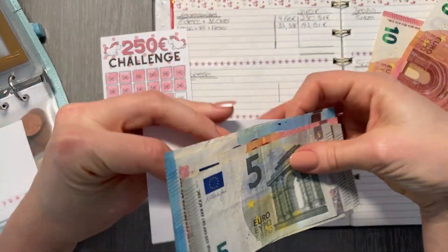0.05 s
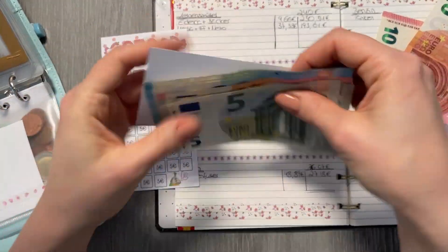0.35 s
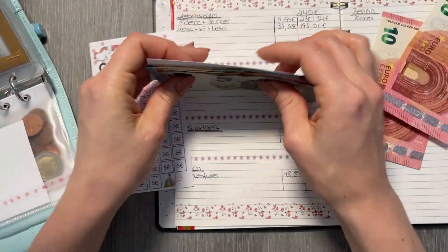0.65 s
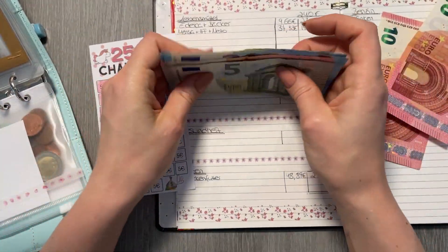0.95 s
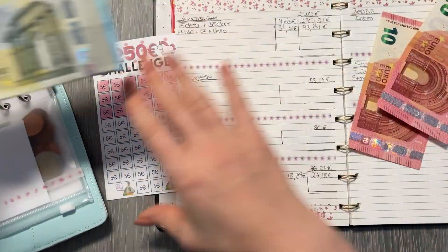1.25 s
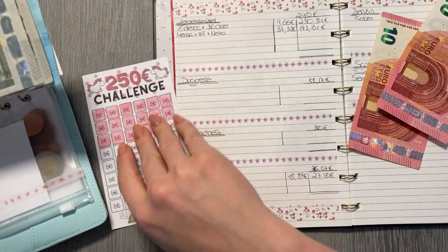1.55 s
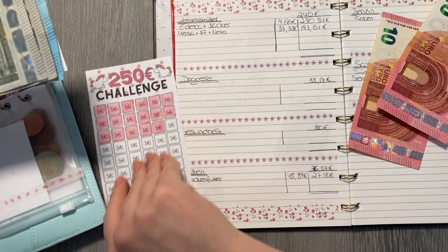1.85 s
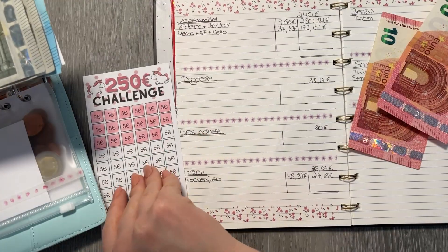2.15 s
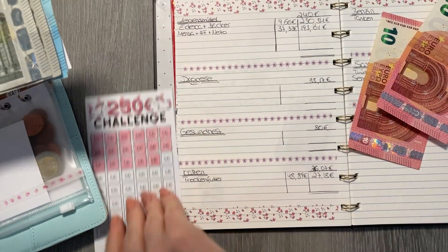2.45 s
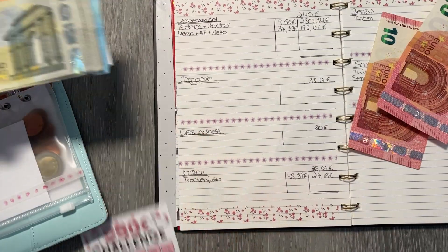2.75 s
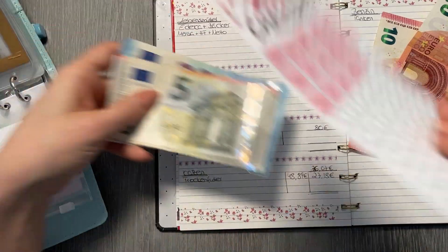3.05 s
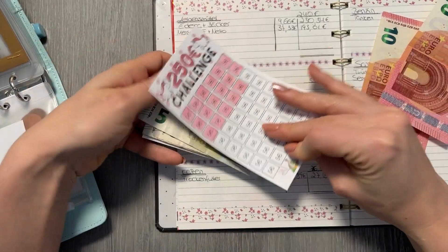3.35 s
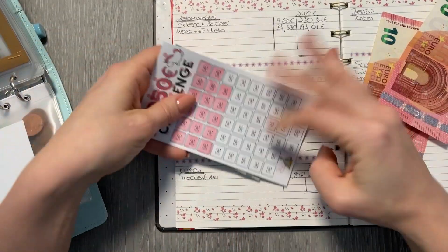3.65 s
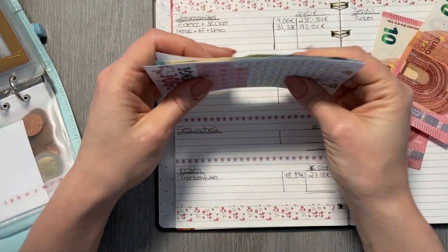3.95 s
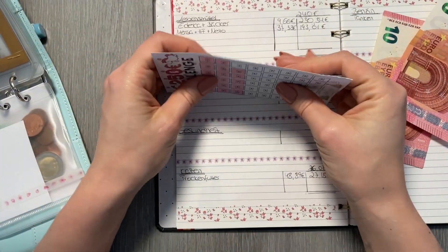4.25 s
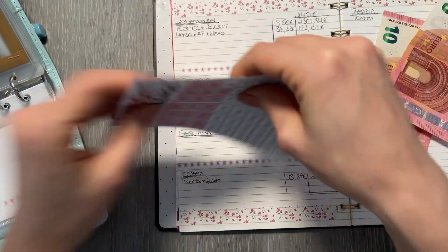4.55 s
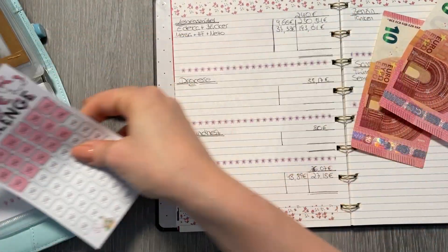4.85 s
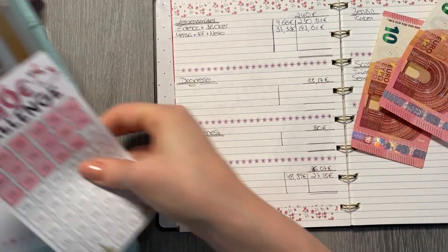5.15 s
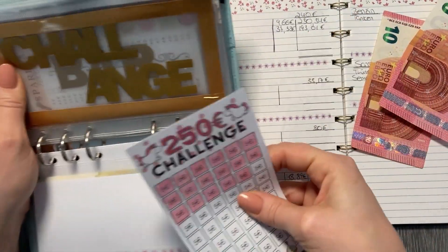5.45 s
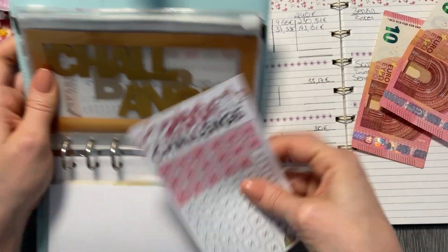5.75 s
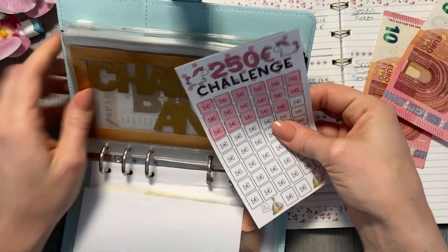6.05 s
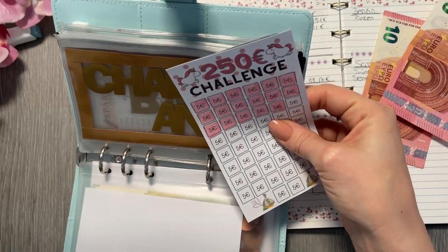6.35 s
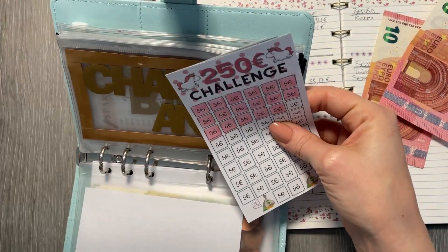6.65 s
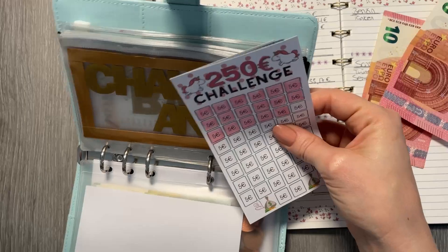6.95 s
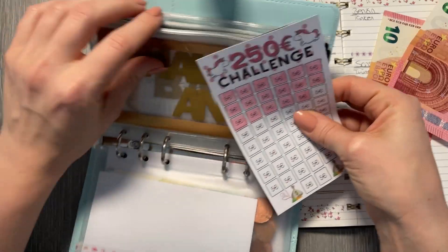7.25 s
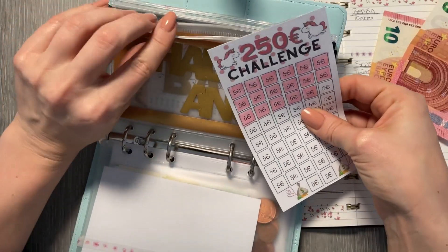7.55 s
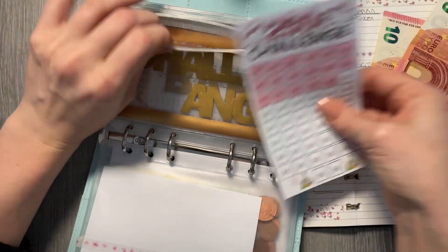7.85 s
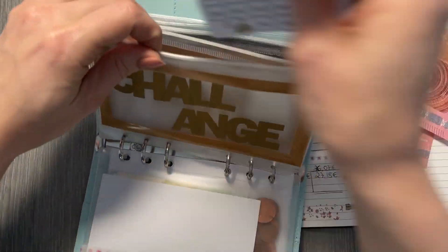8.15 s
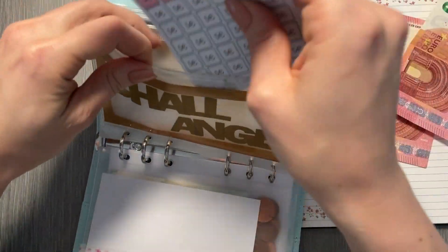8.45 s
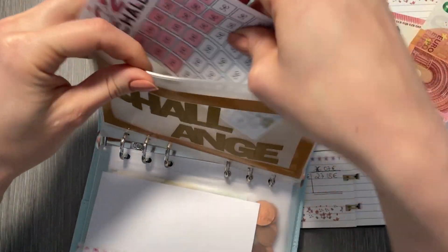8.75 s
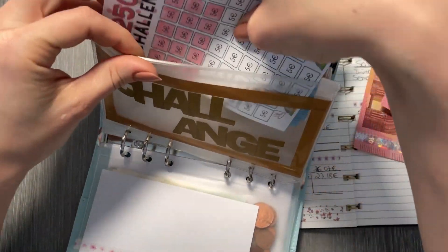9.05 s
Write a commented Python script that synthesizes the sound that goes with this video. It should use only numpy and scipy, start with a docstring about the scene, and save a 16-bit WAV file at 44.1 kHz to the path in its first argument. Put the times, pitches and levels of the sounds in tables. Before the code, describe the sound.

Close to the microphones in a small quiet room, hands square up banknotes and a card on a desk. Short, hissy paper rubs mix with edge taps and soft finger thuds, with a sharp crease snap near 0.4 seconds and firmer taps with a dull flap around 1.3. At 2.6 the card slips off the desk's edge, its rub falling in pitch. Light rustling and tapping continue until about 5.1, when a ring binder is shifted. Its cover slaps down once at 5.4, the loudest sound, and the binder is dragged over the desk in low, juddering shoves until about 6.7. Scattered taps and rubs follow. From 8.3 the card is pushed into a plastic pocket in short, hoarse strokes, with small clicks and rustles up to about 9 seconds. A faint deep hum lies underneath, a little stronger in the second half.

```python
"""In a small quiet room, close to a pair of microphones, hands square up banknotes and a card on a desk.
Paper rubs and crackles as its fibres catch and let go; sheet edges and fingernails tap.
At 2.6 s the card slips off the desk's edge and its rub falls in pitch. At 5.4 s the cover of a ring
binder is turned over and slaps down once; then the binder is dragged, juddering, over the desk.
From 8.3 s the card is pushed into a plastic pocket in short, hoarse strokes."""
import sys
import numpy as np
from scipy import signal
from scipy.fft import rfft, irfft, next_fast_len
from scipy.io import wavfile
from scipy.ndimage import map_coordinates

SR = 44100
rng = np.random.default_rng(int(sys.argv[2]) if len(sys.argv) > 2 else 0)


def digitize_waveform(pressure):
    """Quantize a signal to 16-bit integers and store it at the path in sys.argv[1].

    Rows of a 2-D input are taken as channels; values are limited to [-1, 1].
    """
    field = np.atleast_2d(pressure).T
    bounded = np.clip(field, -1, 1)
    quanta = np.round(bounded * 32767).astype(np.int16)
    wavfile.write(sys.argv[1], SR, quanta)


N = 401751
TIME = np.arange(N) / SR
HIT_SIZE = 8192  # samples in one short sound


def from_db(db):
    """Turn decibels into a gain to multiply by."""
    return 10 ** (np.asarray(db) / 20)


def rms_one(x):
    """Scale a sound to an average strength (rms) of 1."""
    return x / np.sqrt(np.mean(x ** 2) + 1e-20)


def unit_hit(x):
    """Scale a short sound to the energy of ten milliseconds at rms 1."""
    return x * np.sqrt(SR / 100 / (np.sum(x ** 2) + 1e-20))


def gain_at(points, hz):
    """Read the gain at any frequency from a table of (f/Hz, level/dB)."""
    f, db = np.transpose(points)
    return from_db(np.interp(np.log(hz + 1), np.log(f), db))


def colour(x, points):
    """Shape bass and treble by a table, falling away steeply beyond its ends."""
    size = next_fast_len(len(x))
    hz = np.fft.rfftfreq(size, 1 / SR)
    ends = [(points[0][0] / 2, points[0][1] - 20), *points, (points[-1][0] * 2, points[-1][1] - 10)]
    skirts = np.minimum(hz / ends[0][0], 1) ** 2 * np.minimum(ends[-1][0] / (hz + 1), 1) ** 2
    return irfft(rfft(x, size) * gain_at(ends, hz) * skirts, size)[:len(x)]


def band(x, low_hz, high_hz):
    """Keep the part of a sound between two frequencies."""
    sos = signal.butter(2, [low_hz, min(high_hz, SR / 2 - 500)], "band", fs=SR, output="sos")
    return signal.sosfilt(sos, x + 1e-18 * (np.arange(len(x)) % 3))


def drift(per_s):
    """A random wobble of size about 1 that turns about per_s times a second."""
    points = rng.standard_normal(8192)
    return rms_one(np.interp(TIME * per_s, np.arange(len(points)), points))


def add(out, s, hit):
    """Mix a short sound in at s seconds."""
    start = int(s * SR)
    out[start:start + len(hit)] += hit[:N - start]


def glide(x, octaves):
    """Slide a sound's pitch by so many octaves from start to end."""
    speed = 2 ** (octaves * np.linspace(-.5, .5, len(x)))
    return np.interp(np.cumsum(speed) % len(x), np.arange(len(x)), x)


def swell(start, length):
    """The samples and gain of one slide: it grips, peaks, eases, lets go and trails off."""
    end = start + length
    grip_s = .0063 + .15 * length  # a longer slide takes longer to get going
    times = [start - grip_s, start, start + .62 * length, end, end + .019, end + .12]
    span = slice(max(int(times[0] * SR), 0), int(times[-1] * SR))
    return span, from_db(np.interp(TIME[span], times, [-48, -7, 0, -8.5, -17.5, -42]))


def friction(per_s, spread_db, smooth, clump_db):
    """Fibres catch and let go: clumps of tiny, uneven slips over a smooth rub."""
    sizes = from_db(spread_db * np.minimum(rng.exponential(1, N), 4)) * rng.standard_normal(N)
    slips = rms_one(sizes * (rng.random(N) < per_s / SR))
    return (slips + smooth * rng.standard_normal(N)) * from_db(clump_db * drift(170))


def burst(decay_s):
    """A contact: a flurry of tiny impacts that dies away."""
    t = TIME[:HIT_SIZE]
    return rng.choice([-1, 1], HIT_SIZE) * np.exp(-np.minimum(t / decay_s, 20)) * (1 - np.exp(-t * 5000))


def bend(x, lag_s):
    """In a bending sheet high notes travel fastest; lag_s sets how far the low ones fall behind."""
    hz = np.fft.rfftfreq(HIT_SIZE, 1 / SR)
    delay = lag_s * np.maximum(np.sqrt(1000 / (hz + 100)) - 1 / 3, 0)
    return irfft(rfft(x) * np.exp(-2j * np.pi * np.cumsum(delay) * hz[1]))


def ring(force, hz, fade_s):
    """One natural note of an object: a push sets it ringing, and it falls 60 dB in fade_s."""
    r, w = np.exp(-np.log(1000) / (fade_s * SR)), 2 * np.pi * hz / SR
    return signal.lfilter([0, np.sin(w)], [1, -2 * r * np.cos(w), r * r], force + 1e-18)


def held_sheet(force, hz, cycles):
    """A held sheet rings briefly at three notes around hz; every new grip shifts them."""
    notes = hz * np.array([.72, 1, 1.42]) * from_db(rng.normal(0, 1.0, 3))
    return sum(sign * ring(force, f, cycles / f) for sign, f in zip([.6, -1, .8], notes))


def rasp(slips, hz):
    """Slips sound through a bent sheet, broadly around hz."""
    broad = rms_one(band(slips, hz / 2.1, hz * 1.9))
    return rms_one(broad + .4 * rms_one(held_sheet(slips, hz, cycles=14)))


# The tone of the quiet room: f/Hz, relative level/dB
ROOM_NOISE_TONE = [(32, -13.5), (65, 1), (170, 0.5), (400, -16.5), (1300, -24.5), (12000, -39.5)]
def room_noise():
    """A faint, steady noise, mostly bass."""
    return from_db(-68.5) * rms_one(colour(rng.standard_normal(N), ROOM_NOISE_TONE))


# How a deep hum grows and fades: t/s, level/dB
HUM_LEVELS = [(0.0, -64.5), (3.0, -64.5), (5.4, -49.5), (5.85, -48), (6.2, -55.5), (7.6, -45.5),
              (8.25, -66), (9.1, -61)]
def hum(hz):
    """A deep, wavering hum with some rumble around it."""
    tone = np.sin(2 * np.pi * np.cumsum(hz + 3 * drift(1.8)) / SR)
    rumble = rms_one(band(rng.standard_normal(N), 40, 43))
    return from_db(np.interp(TIME, *np.transpose(HUM_LEVELS))) * rms_one(tone + .27 * rumble)


def room_echo(x, tail_db, near_db, fade_s):
    """Echoes from things close by, then a soft tail; above the bass each microphone gets its own."""
    t = TIME[:SR // 2]
    left, right, shared = rng.standard_normal((3, len(t)))
    heard = []
    for own in (left, right):
        near = band(own, 580, 6200) * np.exp(-t / .0017) * (t > .001)
        wash = .7 * band(shared, 150, 450) + band(own, 450, 8500)
        tail = wash * np.exp(-np.log(1000) * t / fade_s) * (t > .006)
        echoes = from_db(near_db) * near / np.linalg.norm(near)
        echoes += from_db(tail_db) * tail / np.linalg.norm(tail)
        heard.append(signal.fftconvolve(x, echoes)[:N])
    return np.array(heard)


# The background drops for short spans: start t/s, end t/s
QUIET_SPANS = [(2.058, 2.37), (3.7, 3.71), (4.66, 4.78), (6.08, 6.15), (6.902, 7.03), (7.568, 7.66)]
def quiet_gain(hush_db=-15.5, fade_s=.015):
    """Gain of the faint rustle: 1, dropping in each quiet span."""
    hushed = sum(np.clip(np.minimum(TIME - a, b + fade_s - TIME) / fade_s, 0, 1) for a, b in QUIET_SPANS)
    return from_db(hush_db * hushed)


def fidget(surface, edge):
    """Held paper rustles faintly and unevenly; in the quiet spans the sound drops away."""
    return quiet_gain() * from_db(-66.5 + 5.5 * drift(25)) * (surface + .9 * rasp(edge, hz=1830))


# The tone of a flexing sheet: f/Hz, relative level/dB
FLEX_TONE = [(150, -17.5), (300, 1.5), (550, -3.5), (850, -4.5), (1500, -7.5)]
def sheet_flex():
    """The dull, lumpy voice of a flexing sheet."""
    return rms_one(colour(friction(per_s=660, spread_db=2, smooth=1, clump_db=3.5), FLEX_TONE))


# The tone of a deep paper flap: f/Hz, relative level/dB
FLAP_TONE = [(35, -45), (65, 10), (100, 0), (140, 3), (240, -2), (400, -18.5), (900, -44.5)]
# A hand comes down or bends the stack: t/s, length/s, flap level/dB, flex level/dB
HAND_PRESSES = [(0.183, 0.033, -46, -26), (1.307, 0.073, -31, -33.5), (1.722, 0.1, -37, -54),
                (1.923, 0.082, -40.5, -56), (2.485, 0.05, -35, -42), (3.077, 0.024, -50, -65),
                (3.974, 0.14, -52, -66), (4.799, 0.088, -41, -39.5), (4.896, 0.084, -34.5, -39),
                (5.002, 0.086, -39, -52.5), (5.4, 0.13, -35.5, -34.5), (5.718, 0.37, -44.5, -42.5),
                (6.366, 0.61, -48, -51), (7.147, 0.047, -44, -40.5), (8.006, 0.16, -50, -49.5),
                (8.742, 0.28, -49, -48.5)]
def presses(flex, rise_s=.01):
    """Sheets flap dully under a hand: a quick rise, a sag while it stays, then a release."""
    flap_gain, flex_gain = from_db([[-57.5], [-66.5]]) * quiet_gain()  # faint stirring between presses
    for start, length, flap_db, flex_db in HAND_PRESSES:
        span = slice(max(int(start * SR), 0), int((start + length + .5) * SR))
        t = np.maximum(TIME[span] - start, 0)
        flap_fall_db = 12 * np.minimum(t / length, 1) + 171.5 * np.clip(t - length, 0, 1)
        rise = np.minimum(t / rise_s, 1)
        flap_gain[span] += rise * from_db(flap_db - flap_fall_db)
        flex_gain[span] += rise * from_db(flex_db - 1.64 * flap_fall_db)  # the flex dies sooner
    flap = rms_one(colour(friction(per_s=200, spread_db=2.5, smooth=1.3, clump_db=3), FLAP_TONE))
    return flap_gain * flap + flex_gain * flex


# Fingers land on the notes, the card or the binder: t/s, level/dB
FINGER_THUDS = [(.195, -45), (.761, -49), (1.018, -45.5), (1.657, -43), (1.723, -38), (1.927, -45),
                (2.021, -43.5), (2.242, -48), (2.488, -42.5), (3.071, -39.5), (3.508, -52), (8.032, -41.5)]
def thuds():
    """A soft push sends a wave through the pile of paper: it drops in pitch and quickly dies."""
    out = np.zeros(N)
    for s, db in FINGER_THUDS:
        push = band(signal.unit_impulse(HIT_SIZE) + .036 * burst(.019), 105, 1600)
        dull = signal.sosfilt(signal.butter(1, 330, fs=SR, output="sos"), push)
        add(out, s, from_db(db) * unit_hit(bend(dull, lag_s=.00506)))
    return out


# Creases and sheet corners snap: t/s, level/dB, centre f/Hz
CREASE_SNAPS = [(0.329, -47, 3480), (.446, -22.5, 8450), (.459, -37, 6980), (.61, -40.5, 3120),
                (0.662, -46, 2600), (0.7603, -30.5, 2370), (1.015, -34, 3840), (1.367, -32, 3580),
                (3.294, -40, 2780), (3.344, -34, 2200), (3.61, -39, 4070), (3.808, -46, 3000),
                (4.111, -44.5, 1800), (4.473, -53, 4500), (5.778, -40.5, 4940), (7.8, -42, 3560),
                (7.836, -47.5, 1690), (8.005, -43.5, 2420), (8.536, -49, 2140), (8.753, -42, 3000),
                (8.973, -42, 1590)]
def snaps():
    """A crease flips over: one dry crack without a pitch, gone in a few milliseconds."""
    out = np.zeros(N)
    for s, db, hz in CREASE_SNAPS:
        flip = burst(.00064) + .051 * burst(.0075)
        crack = band(band(flip, hz / 3.64, hz * 3.9), 250, 7100)
        add(out, s, from_db(db) * unit_hit(bend(crack, lag_s=.001)))
    return out


def touch(knock_db, hz, sharp_db):
    """A sharp tick, then a hollow knock that sweeps down in pitch through the sheet."""
    tick = unit_hit(band(burst(.00035) + .064 * burst(.0092), 4700, 10070))
    contact = burst(.00086) + .19 * burst(.0077)
    knock = unit_hit(band(contact, hz / 2.2, hz * 2)) + .7 * unit_hit(held_sheet(contact, hz, cycles=6))
    knock = band(knock, 200, hz * max(4 + .095 * sharp_db, 1.3))  # a soft touch has no treble
    return from_db(knock_db) * (from_db(sharp_db) * tick + unit_hit(bend(knock, lag_s=.002504)))


# Sheet edges and nails tap: t/s, knock level/dB, knock f/Hz, tick level over the knock/dB
EDGE_TAPS = [(0.191, -38.5, 647, 5.5), (.231, -37.5, 1930, -0.5), (1.309, -27, 1170, 1),
             (1.358, -28.5, 1030, -8), (1.657, -43.5, 1200, -7), (1.723, -47, 890, -18),
             (1.928, -42, 1560, 1.5), (2.243, -46, 1340, -4), (2.827, -37, 720, 2), (3.071, -38.5, 590, -5),
             (3.2461, -33.5, 1050, -40), (3.35, -31.5, 1730, -4), (3.817, -41, 1430, -5),
             (3.966, -47, 1900, 0), (4.055, -31, 1090, -3.5), (4.806, -46, 1080, 3.5),
             (4.923, -37.5, 1040, -17), (5.146, -28.5, 980, -7.5), (5.287, -37, 940, -35),
             (5.36, -34, 620, -20), (5.543, -44.5, 1007, 5), (5.566, -29, 1230, -8),
             (5.614, -38, 1020, -43), (5.707, -35.5, 1100, -29), (5.745, -38, 1340, 3.5),
             (5.8, -31.5, 1006, -11.5), (5.85, -34, 890, -27), (5.99, -43, 1890, -3),
             (6.274, -41, 1060, -12.5), (6.367, -27.5, 1160, -6.5), (6.576, -31.5, 785, -25),
             (6.835, -40.5, 692, -11.5), (7.154, -36.5, 1070, -8), (7.408, -39.5, 2120, -2),
             (7.994, -39, 705, -11), (8.032, -38.5, 1470, -2.5), (8.243, -34, 1180, -0.5),
             (8.6015, -32, 1010, -13), (8.816, -41.5, 970, -20), (8.983, -31, 1005, -4.5)]
def taps():
    """Each tap is followed by the desk's woody answer and the thud of the hand behind it."""
    out = np.zeros(N)
    for s, knock_db, hz, sharp_db in EDGE_TAPS:
        wood = from_db(knock_db - 14) * unit_hit(band(burst(.015), 200, 640))
        thud_db = -45 + .88 * (knock_db + 36.5)  # a harder knock has a heavier thud
        thud = from_db(thud_db) * unit_hit(band(burst(.018), 65, 280))
        add(out, s - .0006, touch(knock_db, hz, sharp_db) + bend(wood + thud, lag_s=.001988))
    return out


# The notes of the binder lying on the desk: f/Hz, relative level/dB, time to fall 60 dB/s
BINDER_NOTES = [(222, -1, 0.076), (342.6, 0.5, 0.052), (496, -5.5, 0.055), (595, 0.5, 0.05),
                (693, -1.5, 0.05), (870, 2, 0.03), (1160, -7.5, 0.022), (1566, 5, 0.034),
                (2300, -7.5, 0.033), (2480, 2.5, 0.013)]
def binder(force, stretch=1):
    """The binder rings briefly and its padded cover flops; a hand's grip stretches the pitches."""
    notes = sum((-1) ** k * from_db(db) * ring(force, hz * stretch, fade_s)
                for k, (hz, db, fade_s) in enumerate(BINDER_NOTES))
    flop = from_db(-7) * rms_one(band(force, 200, 1500))
    return rms_one(notes) + flop


def judder(per_s=105):
    """The binder sticks and slips: uneven jerks over a finer rub, coming in lumps."""
    count = np.cumsum(per_s * np.exp(.35 * drift(150))) / SR
    jerks = np.diff(np.floor(count), prepend=0) * from_db(2.5 * drift(200))
    rub = rms_one(friction(per_s=350, spread_db=1.5, smooth=.6, clump_db=1.5))
    return (rms_one(jerks) + .6 * rub) * from_db(2.5 * drift(70))


# The binder is lifted, opened and dragged: t/s, length/s, drag level/dB, drag f/Hz
BINDER_SHOVES = [(5.144, 0.025, -33.5, 500), (5.183, 0.24, -44, 586), (5.434, 0.16, -41, 510),
                 (5.572, 0.39, -51, 484), (6.175, 0.039, -45.5, 358), (6.27, 0.032, -39.5, 355),
                 (6.365, 0.049, -31, 252), (6.418, 0.073, -38.5, 382), (6.496, 0.052, -34.5, 352),
                 (6.55, 0.072, -30, 385), (6.618, 0.09, -31, 390)]
def shoves(surface, edge, scrape_hz=1100, crackles_per_s=16):
    """The pushed binder judders over the desk and rings; its plastic scrapes, hisses and crackles."""
    out = np.zeros(N)
    jerks = judder()
    grit = edge + .29 * jerks
    for start, length, db, hz in BINDER_SHOVES:
        span, gain = swell(start, length)
        harder_db = db + 42  # how far this shove is above a gentle one
        rings = binder(jerks[span], stretch=2 ** rng.uniform(-.05, .05))
        drag = from_db(db) * rms_one(band(rings, hz / 1.65, hz * 1.93))
        scrape = from_db(-49 + .35 * harder_db) * rasp(grit[span], scrape_hz)
        hiss = from_db(-54.5 + .22 * harder_db) * surface[span]
        out[span] += gain * (drag + scrape + hiss)
        for when, size, pitch in rng.uniform(-1, 1, (round(crackles_per_s * length), 3)):
            crackle = touch(-46 + .35 * harder_db - 5 * size, scrape_hz * 2 ** (pitch / 2), sharp_db=-17)
            add(out, start + length * (1 + when) / 2, crackle)
    return out


# The cover lands, corner first, then flat: t/s, ring level/dB, crack level/dB
COVER_CONTACTS = [(5.4088, -15.5, -18), (5.4108, -19.5, -18), (5.4132, -16, -38), (5.4226, -26, -27),
                  (5.438, -26.5, -36.5)]
def slap():
    """The plastic cover cracks down in a few quick contacts, each ringing the binder."""
    out = np.zeros(N)
    for s, ring_db, crack_db in COVER_CONTACTS:
        blow = signal.unit_impulse(HIT_SIZE) + .17 * burst(.0054)
        boom = unit_hit(bend(binder(blow), lag_s=.00308))
        bright = band(burst(.0043) + .12 * burst(.02), 6100, 9300)
        crack = unit_hit(bright + .75 * band(burst(.003), 930, 5200))
        add(out, s, from_db(ring_db) * boom + from_db(crack_db) * crack)
    return out


def card_rasp(slips, hz):
    """Slips sound through the stiff card: a narrower, hollow rasp around hz."""
    return rms_one(band(rasp(slips, hz), hz / 2.16, hz * 1.7))


def slip_off(edge, start_s, length_s):
    """The card slides off the desk's edge: its rub breaks into loose scrapes, drops in pitch and fades."""
    out = np.zeros(N)
    span = slice(int(start_s * SR), int((start_s + length_s) * SR))
    loose = edge * from_db(7 * drift(90))
    rub = glide(card_rasp(loose[span], hz=1540), octaves=-2.1)
    out[span] = rub * signal.windows.tukey(len(rub), .2) * from_db(np.linspace(-40.5, -50.5, len(rub)))
    return out


# The card goes into the pocket: t/s, length/s, rasp level/dB, rasp f/Hz, hiss level/dB
CARD_PUSHES = [(8.282, 0.073, -35.5, 1740, -42), (8.38, 0.1, -46, 2070, -45.5),
               (8.536, 0.056, -36, 1680, -47)]
def pocket(surface, edge):
    """The card's edge is pushed along the plastic in short, hoarse strokes."""
    out = np.zeros(N)
    for start, length, db, hz, hiss_db in CARD_PUSHES:
        span, gain = swell(start, length)
        # the rasp needs pressure and stops before the hiss does
        scrape = from_db(db) * np.sqrt(gain) * card_rasp(edge[span], hz)
        out[span] += gain * (scrape + from_db(hiss_db) * surface[span])
    return out


def desk_bounce(x, strength=.45):
    """Sound bounces off the desk; the delay wanders, as it does when hands rise and fall."""
    delay_s = .0007 * 2 ** (.5 * drift(2))
    echo = map_coordinates(x, [np.arange(N) - delay_s * SR], order=3)
    return (x + strength * echo) / np.hypot(1, strength)


# The tone of a rubbed surface: f/Hz, relative level/dB
HISS_TONE = [(1500, -33.5), (3000, -3.5), (4500, -0.5), (6200, 5), (8500, 5), (11000, 1)]
def rub_textures():
    """The fine hiss of a surface and the coarser slips of an edge; both share the largest slips."""
    shared = .5 * friction(per_s=300, spread_db=-.5, smooth=1, clump_db=-3.5)
    fine = friction(per_s=6600, spread_db=2, smooth=1, clump_db=2)
    coarse = friction(per_s=2100, spread_db=1.5, smooth=1, clump_db=3.5)
    return desk_bounce(rms_one(colour(fine + shared, HISS_TONE))), rms_one(coarse + shared)


# Paper rubs on paper and plastic: t/s, length/s, rasp level/dB, rasp f/Hz, hiss level over the rasp/dB
PAPER_STROKES = [(0, 0.021, -36.5, 2060, -17), (0.084, 0.11, -40.5, 3150, -0.5),
                 (0.373, 0.07, -43, 3700, -0.5), (0.594, 0.1, -48, 2250, 2.5), (0.789, 0.12, -43, 1900, 1),
                 (0.912, 0.025, -44.5, 1910, 2.5), (0.97, 0.021, -48.5, 3030, 2),
                 (1.016, 0.16, -66, 3020, 16), (1.308, 0.13, -46, 2260, 3.5),
                 (1.42, 0.041, -52.5, 3780, 10.5), (1.467, 0.074, -44, 3780, 10),
                 (1.686, 0.036, -43, 3600, 6), (1.799, 0.027, -39, 3840, 6.5), (1.921, 0.037, -46, 3040, 4),
                 (2.302, 0.051, -51, 3600, 6.5), (2.377, 0.19, -47, 3320, 11), (2.554, 0.26, -50, 4570, 16),
                 (2.805, 0.23, -72.5, 4500, 22.5), (3.107, 0.033, -48.5, 2230, -1.5),
                 (3.238, 0.017, -43.5, 980, -22), (3.267, 0.11, -47.5, 1610, 5),
                 (3.406, 0.023, -46.5, 2770, 3), (3.523, 0.1, -48, 2740, 2.5),
                 (3.791, 0.04, -45, 2660, 7.5), (4.008, 0.071, -46, 1950, 0), (4.262, 0.081, -50, 1960, 3),
                 (4.466, 0.16, -67.5, 4470, 18), (4.954, 0.11, -50.5, 2020, -1.5),
                 (6.381, 0.096, -55, 2600, 12.5), (7.134, 0.13, -52.5, 1860, -9),
                 (7.732, 0.15, -48, 1470, -8), (7.877, 0.065, -40, 3100, -1.5),
                 (8.607, 0.15, -59, 2380, 9.5), (8.724, 0.1, -42.5, 1840, 2),
                 (8.837, 0.17, -51.5, 1740, -3.5)]
def paper(surface, edge, flex, steady_s=.1):
    """In each stroke the surface hisses while the bent sheet rasps, crinkles and flexes."""
    out = np.zeros(N)
    pressure = from_db(2.8 * drift(50))  # fingers never press evenly
    catches = friction(per_s=80, spread_db=1.5, smooth=0, clump_db=1)
    crinkles = rms_one(band(signal.oaconvolve(catches, burst(.00061))[:N], 1200, 6500))
    glides = rng.uniform(-.5, .5, len(PAPER_STROKES))  # the pitch shifts as the sheet bends
    for (start, length, db, hz, hiss_db), octaves in zip(PAPER_STROKES, glides):
        span, gain = swell(start, length)
        # a smooth stroke with little rasp is also the brightest
        hiss = rms_one(signal.lfilter([1, -np.tanh(.019 * hiss_db)], [1], surface[span]))
        sheet = glide(rasp(edge[span], hz), octaves)
        sheet += from_db(-10) * crinkles[span] + from_db(-11) * flex[span]
        wobble = pressure[span] ** min(steady_s / length, 1)  # long strokes run more steadily
        out[span] += from_db(db) * gain * wobble * (sheet + from_db(hiss_db) * hiss)
    return out


def scene():
    """Everything happens on the desk, straight under the microphones."""
    surface, edge = rub_textures()
    flex = sheet_flex()
    desk = paper(surface, edge, flex) + pocket(surface, edge) + slip_off(edge, start_s=2.6, length_s=.11)
    desk += fidget(surface, edge) + shoves(surface, edge)
    desk += presses(flex) + taps() + thuds() + snaps() + slap()
    background = room_noise() + hum(hz=41.3)
    return desk + background + room_echo(desk, tail_db=-18.5, near_db=-12, fade_s=.42)


# How far the phase of the left channel runs ahead of the right: f/Hz, phase/radians
LEFT_LEAD = [(0, 0), (1700, .05), (2700, .75), (4000, .75), (4570, 1.7), (5250, 5.2), (5700, 6.1),
             (8610, 9.2), (9500, 9.6), (11900, 12.4)]
# The tone of the microphones: f/Hz, level/dB
MIC_TONE = [(9000, 0), (11000, 7.5), (12000, -4), (13000, -14.5), (14000, -24.5), (15800, -31.5)]
def record(dry, cutoff_hz=15900):
    """The two channels are out of step in the treble, lift it near 11 kHz and lose the very top."""
    size = next_fast_len(N + HIT_SIZE)
    hz = np.fft.rfftfreq(size, 1 / SR)
    lead = np.interp(hz, *np.transpose(LEFT_LEAD))
    shift = np.exp(.5j * lead * np.array([[1], [-1]]))
    heard = irfft(rfft(dry, size) * gain_at(MIC_TONE, hz) * shift, size)[:, :N]
    return signal.sosfilt(signal.ellip(10, .1, 80, cutoff_hz, fs=SR, output="sos"), heard)


dry = scene()
out = record(dry)
digitize_waveform(out)
```